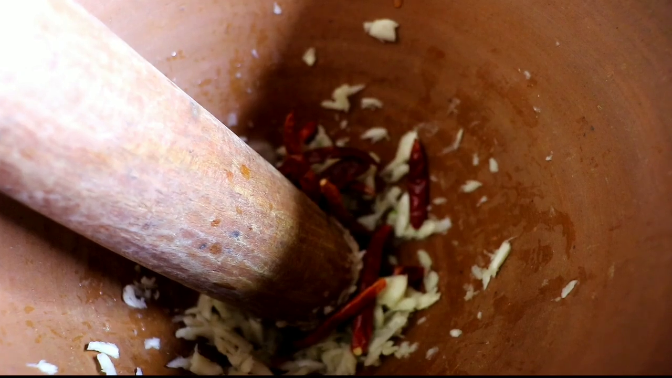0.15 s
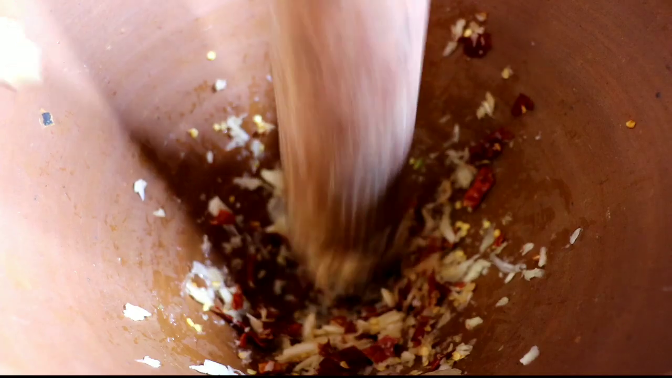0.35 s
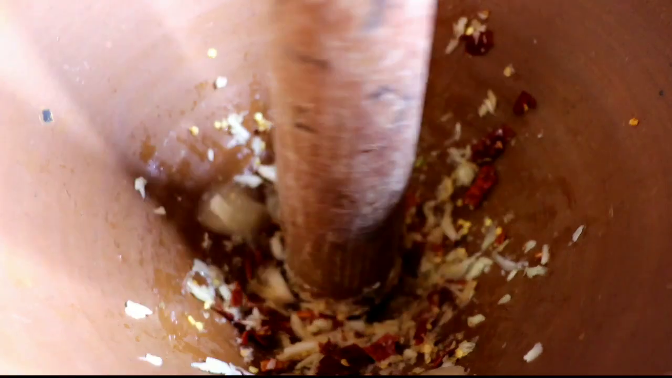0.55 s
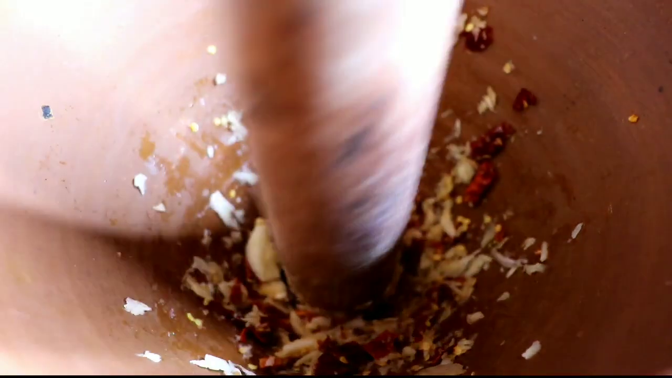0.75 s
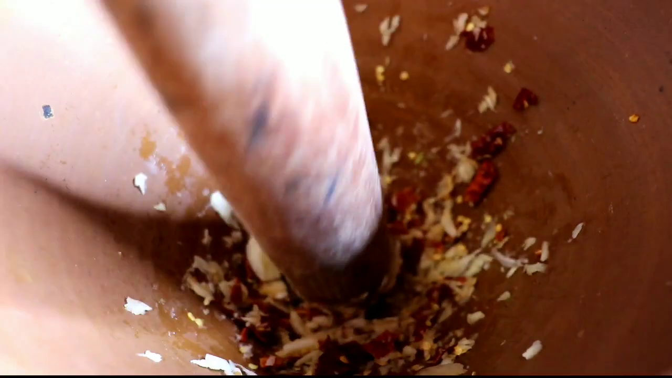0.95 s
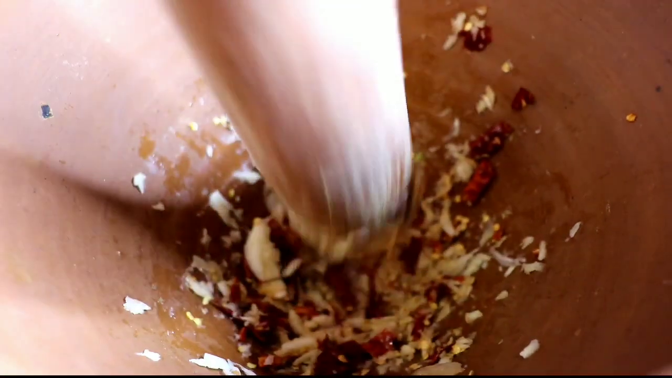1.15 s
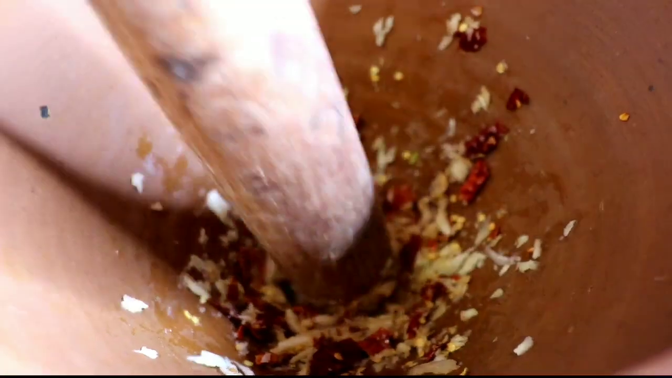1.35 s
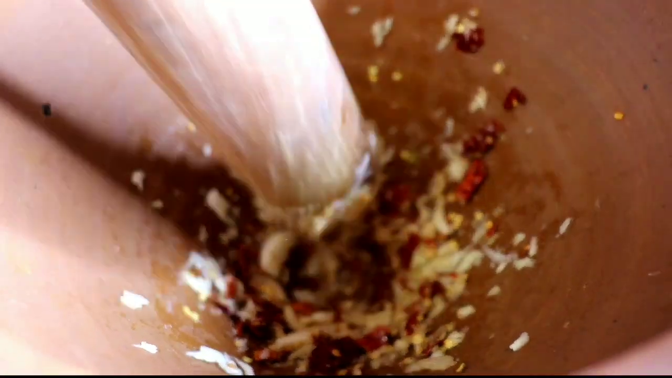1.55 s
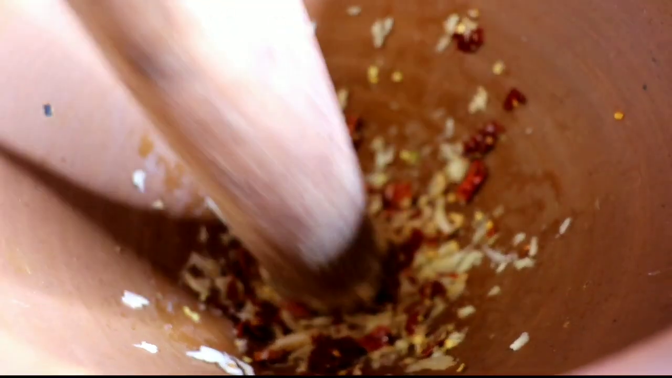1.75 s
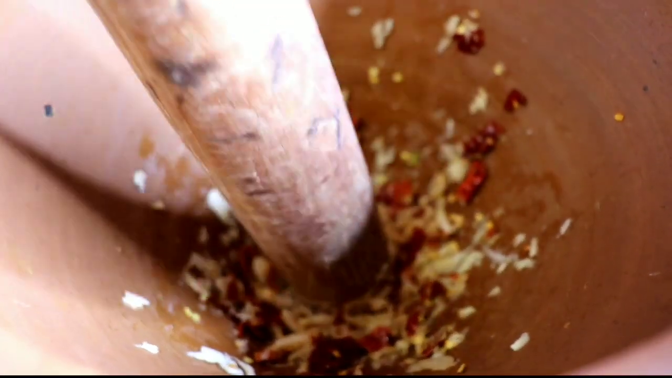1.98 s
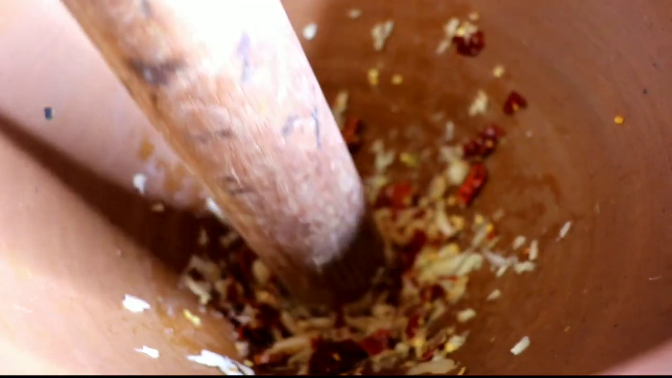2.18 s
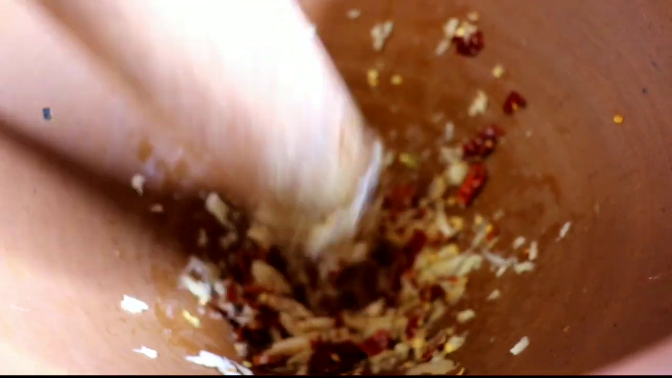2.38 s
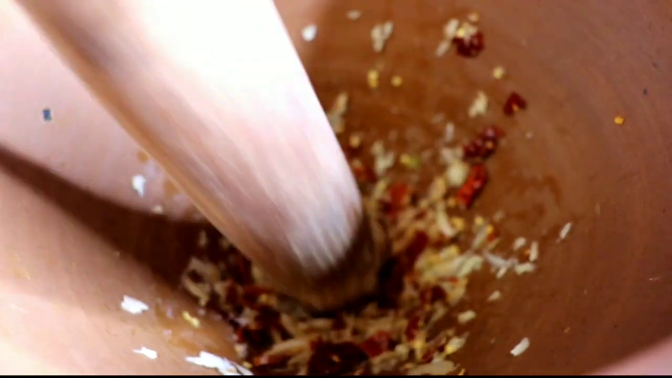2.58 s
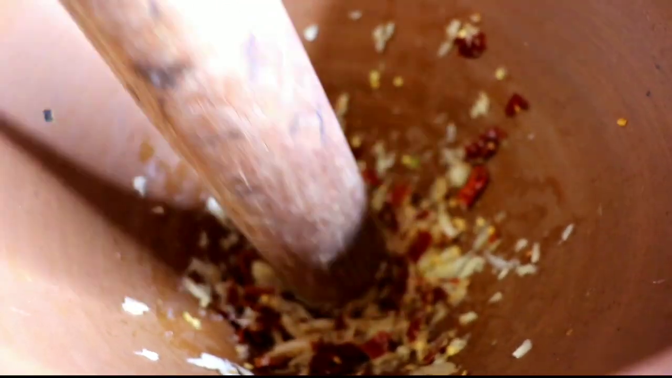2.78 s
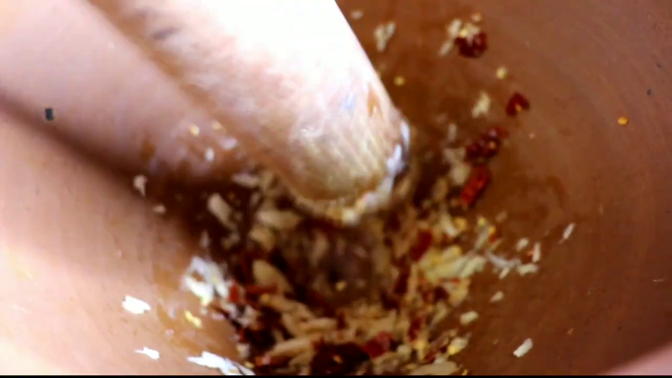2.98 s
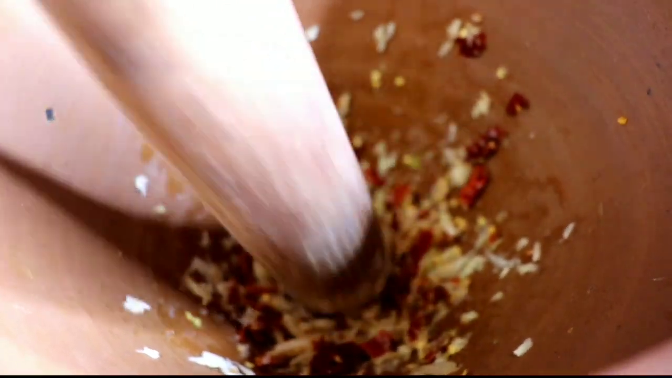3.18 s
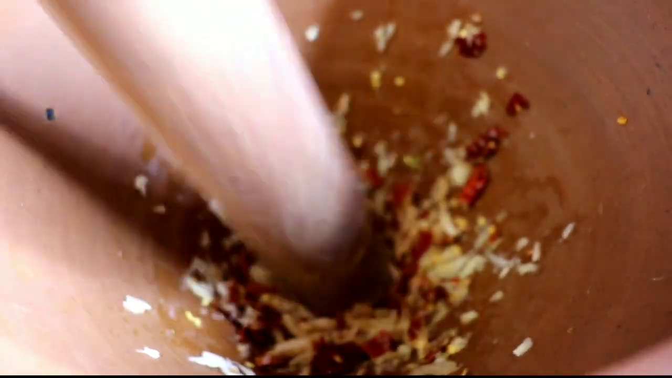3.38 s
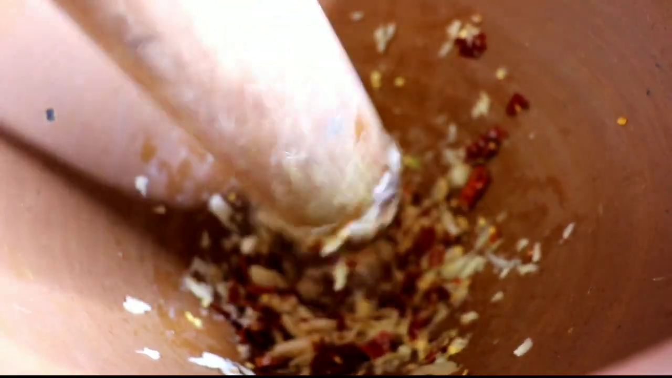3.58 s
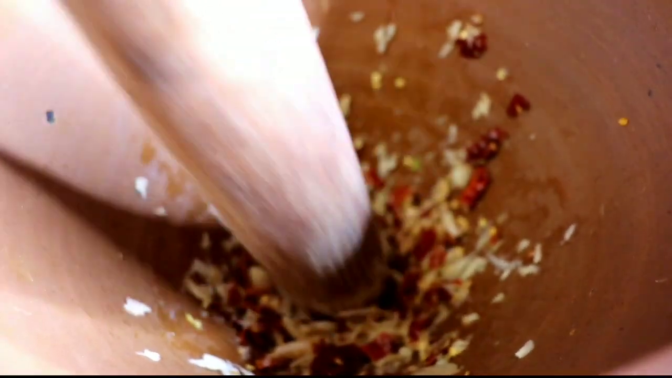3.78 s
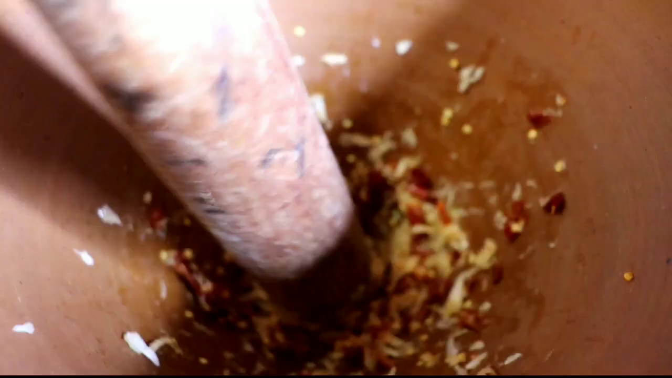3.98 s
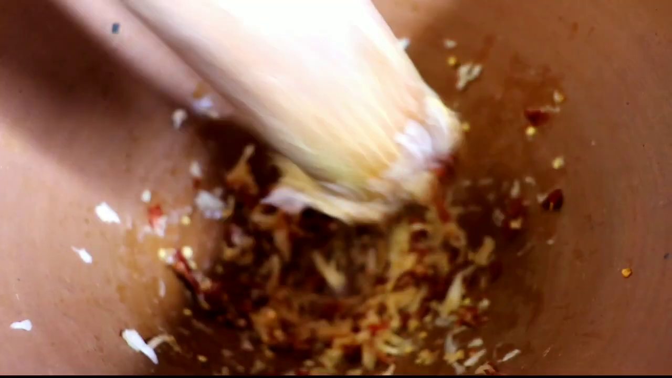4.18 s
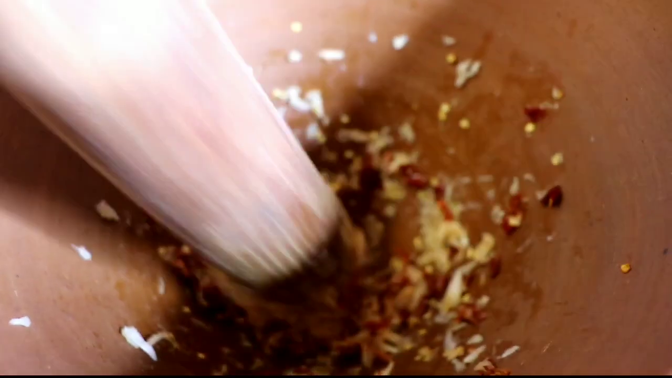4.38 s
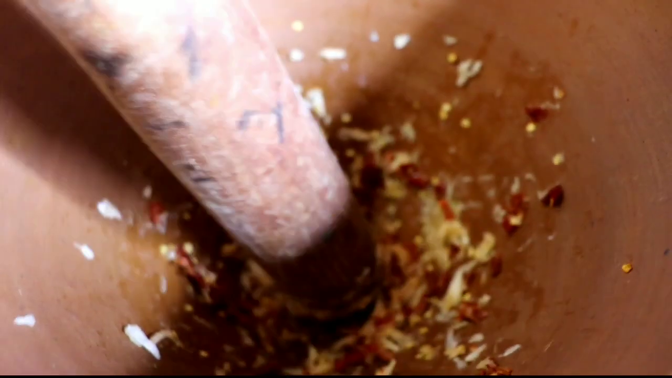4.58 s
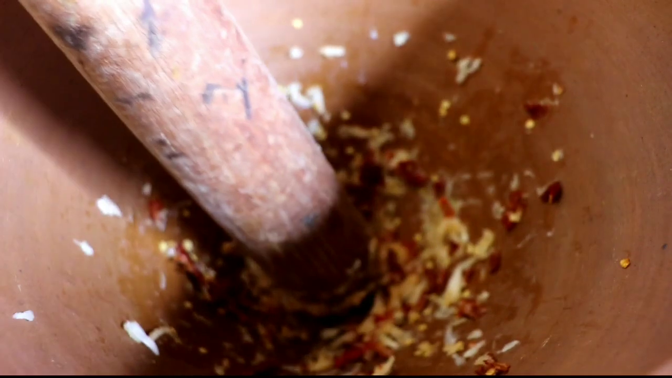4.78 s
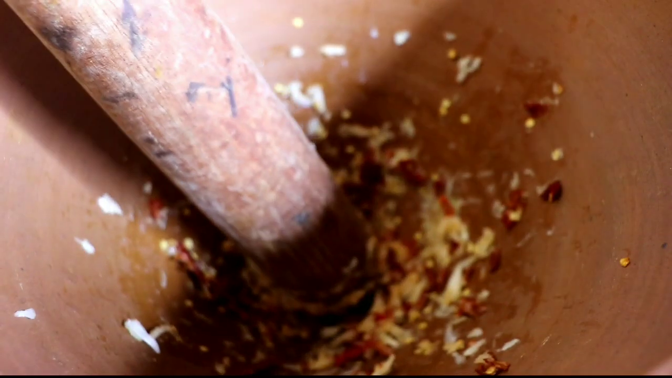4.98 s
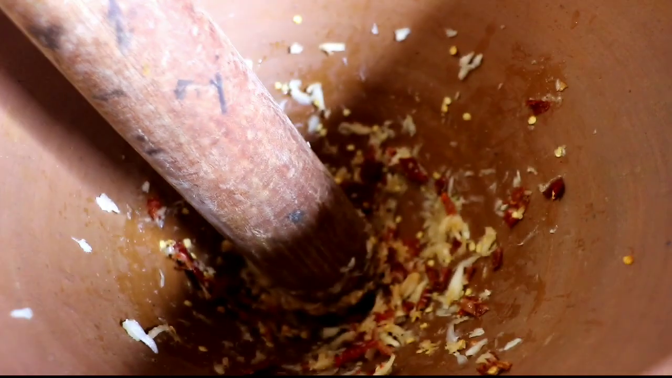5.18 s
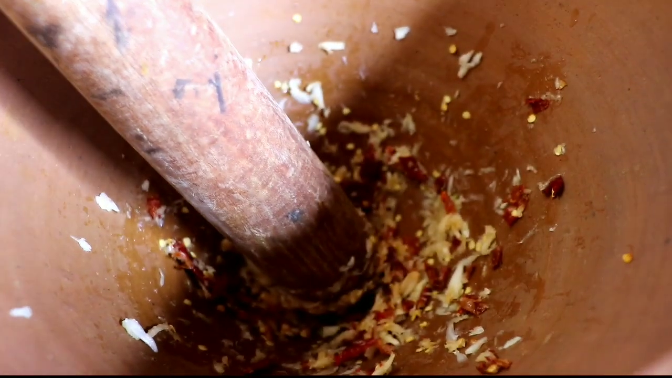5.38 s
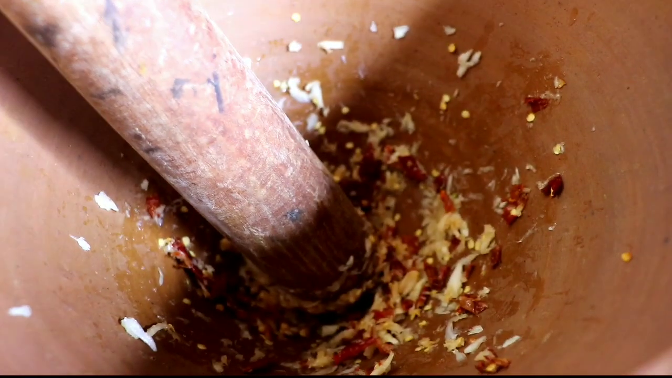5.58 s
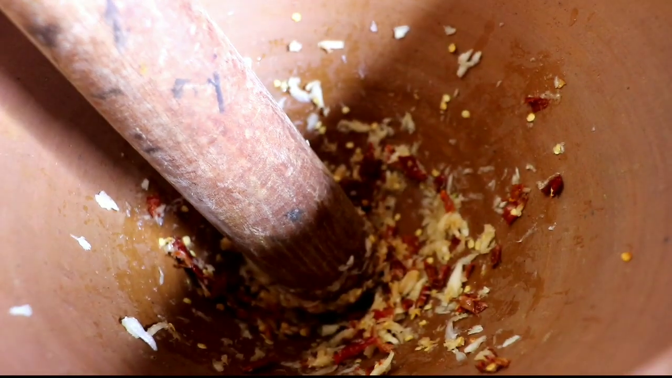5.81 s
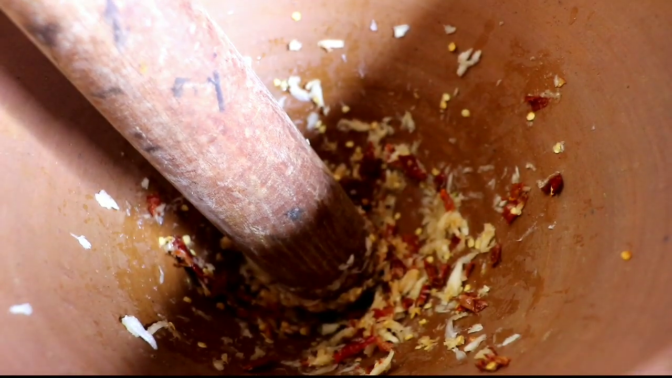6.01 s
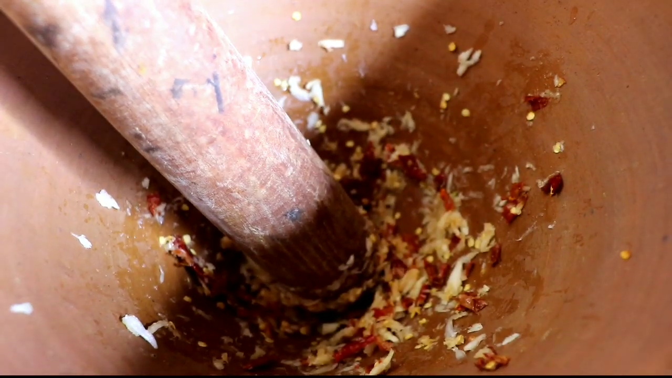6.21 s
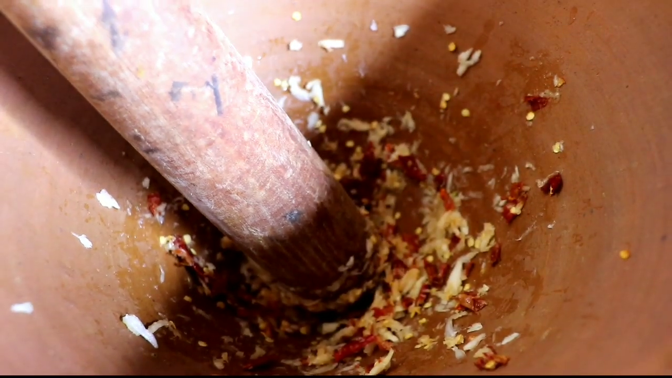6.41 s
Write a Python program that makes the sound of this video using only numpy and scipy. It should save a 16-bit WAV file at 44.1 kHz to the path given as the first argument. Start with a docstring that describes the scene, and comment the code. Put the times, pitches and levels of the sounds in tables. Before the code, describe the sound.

Close up in a kitchen, a wooden pestle knocks into a clay mortar about three times a second, crushing garlic and chilli with gritty crunches and a brief hollow ring. The blows start lighter, then land harder and overload a little as the level gradually falls. After a split-second dropout come three last blows, followed by faint scraping through the paste, small squeaks and soft brushing over quiet room tone.

```python
"""A wooden pestle pounds garlic and chilli in a clay mortar, close under a small stereo microphone.
Lighter blows open: each crushes spice, booms in the bowl, rings the clay and often rebounds.
From 2 s they land harder and overload; the gain ducks and lets the kitchen's echo swell back.
A fader sinks, mutes for an instant at 4 s and comes up again over three more blows.
Then the tip drags, taps and squeaks faintly in the bowl, and soft low brushings close the scene."""
import sys
import numpy as np
from scipy import signal
from scipy.fft import rfft, irfft, next_fast_len
from scipy.io import wavfile
from scipy.ndimage import uniform_filter1d

SR = 44100
rng = np.random.default_rng(int(sys.argv[2]) if len(sys.argv) > 2 else 0)


def int16_out(signal):
    """Quantize to a 16-bit WAV file."""
    q = np.round(np.clip(np.atleast_2d(signal).T, -1, 1) * 32767)
    wavfile.write(sys.argv[1], SR, q.astype(np.int16))


N = 284445

# Pestle hits: (time [s], boom [dB], clay ring [dB], wood clack [dB], table thud [dB], contact [ms],
# room send [dB], crush [dB], crush left over right [dB])
BLOWS = [(0.2919, -6, 0, -4, -37.5, 0.51, 20, -26, -4.5),
         (.594, -18.5, -29, -21.5, -22, 1.05, 12.5, -3, -8),
         (.918, -48.5, -58, -48, -34, 0.9, 7.5, -30.5, 2),
         (1.399, -1, -32, -24.5, -11.5, 1.13, 14, -6.5, 0),
         (1.687, -4, -36, -29, -11.5, 1.1, 16.5, -10, -7),
         (1.9784, 10.5, 4.5, 7, -7.5, 0.47, 8.5, -0.5, -2.5),
         (2.274, 12.5, 3.5, 11, -2.5, 0.12, 6, -4.5, 22.5), (2.5568, 7, -10, -1.5, -5, .6, 13.5, -4, -3.5),
         (2.852, 9, -2.5, 1, -6, 0.46, 7.5, -10, -1), (3.1689, 14, -1, 16, -1.5, 0.4, 3.5, 0, 7),
         (3.4884, 9.5, -11, -0.5, -10, 0.51, 10.5, -3, -2), (3.803, 19, -10, 1, -6, 0.23, 13, 8.5, 9.5),
         (4.074, -15.5, -26.5, -29, -16, .85, 25.5, -19.5, 6),
         (4.387, 9.5, -3.5, -3, -8.5, 0.95, 10.5, -4, -3), (4.6889, 12.5, -0.2, 8.5, -14, 0.32, 6.5, -5, 2),
         (5.265, -45, -47.5, -55.5, -49, .74, 6, -61, -3)]
# The pestle lands again: (time [s], boom [dB], clay ring [dB], crush [dB], crush left over right [dB])
REBOUNDS = [(0.329, -43, -27, -10, -2.5), (1.416, -4, -34, -1, -1.5), (1.705, -3, -27.5, -2.5, 7.5),
            (2.015, 3, -5, 2.5, -1.5), (2.295, 10.5, -8, 3.5, -0.5), (2.587, 0, -5.5, -1, -4),
            (2.881, 5, -17, 1, 0.5), (3.191, 15.5, 3.5, 6, -4.5), (3.503, -10.5, -35, 2.5, -4),
            (4.410, -12, 0.5, -1, 6.5), (4.721, 8.5, -4, 4.5, -2.5)]
# Modes of the air in the bowl, the clay wall and the pestle: (pitch [Hz], level [dB], t60 [s])
HOLLOW_MODES = [(406.6, 3, 0.047), (390.9, -14.5, 0.23), (401, -20.5, 0.27), (520, -16.5, 0.048),
                (680, -35.5, .025)]
CLAY_MODES = [(782, -10.5, 0.27), (716, -24.5, 0.17), (2200, -17, 0.22), (2660, -18, .15), (4900, -27, .06)]
WOOD_MODES = [(923.5, -14.5, 0.15), (988, 4, 0.027), (1095, -6, 0.036), (1225, -3, 0.019),
              (1387, -5, 0.033), (1585, 5, 0.017), (1823, -1.5, 0.015), (2026, -9.5, 0.048),
              (2254, -11, 0.078), (3535, -19.5, 0.01), (4200, -18, 0.01)]
# Loose spice crushed or flicked: (peak time [s], level [dB], attack [ms], decay [ms], centre [Hz])
CRUNCHES = [(.3, -22.5, 2.7, 70, 2500), (.593, -11, 17, 8.4, 3030), (.669, -25.5, 2.8, 3.5, 4000),
            (.743, -31.5, .64, 7.7, 2520), (.867, -55, 2.5, 3.8, 7450), (1.001, -44.5, 5.6, 11, 3540),
            (1.071, -41, 1.16, 5.6, 6900), (1.117, -33, 1.67, 3.6, 2600), (1.135, -42, 1.4, 7.4, 3100),
            (1.193, -43.5, 2.5, 3.3, 6500), (1.27, -48.5, 1.1, 4.7, 3500), (1.775, -20.5, 0.7, 4, 3270),
            (2.035, -8, .6, 1.4, 4140), (2.363, -21, 0.84, 2.2, 2940), (2.963, -25, 2.1, 7.3, 3500),
            (3.006, -34, 1.6, 2.9, 3520), (3.452, -43, 1, 9.6, 3000), (3.567, -20, 1, 5.3, 3520),
            (4.078, -20.5, 6.7, 45, 2780), (4.129, -21.5, 2.1, 4.7, 3930), (4.442, -15, 2.6, 5.8, 4000),
            (4.93, -38.5, 1.04, 1.5, 5760), (4.969, -43, 1.2, 8.1, 4290), (5.201, -40, .32, 2, 2310),
            (5.376, -42, 0.81, 15, 5000), (5.523, -42, .9, 26, 3580), (5.568, -28.5, 1.84, 4.6, 1355),
            (5.578, -41, 9.8, 41, 6250), (5.724, -44.5, 3.1, 3.1, 3650), (5.771, -48, 1.35, 2.5, 2090),
            (5.818, -43.5, 2.14, 2.6, 3470), (5.913, -52, 1.8, 1.8, 4000), (6.177, -55, 2.1, 13, 2500)]
# The tip on bare clay: (time [s], level [dB], decay [ms], pitch [Hz])
SQUEAKS = [(.748, -36, 16.2, 2240), (1.003, -34, 14, 2285), (1.12, -41, 22, 2300), (1.286, -50, 52, 2180),
           (5.267, -43, 7.5, 2140), (5.568, -39, 70, 1390), (5.575, -46.5, 79, 4660), (5.663, -54, 19, 393)]
# The tip in the paste, one envelope a stroke: (time [s], level [dB])
DRAGS = [
    [(0.62, -27), (0.74, -47), (0.968, -43.5), (1.26, -49), (1.39, -51.5)],
    [(4.92, -49), (5.042, -60.5), (5.32, -58), (5.596, -50), (5.678, -50.5), (5.856, -58), (6.112, -90),
     (6.27, -52.5), (6.45, -73)],
]
# Brushings nearby: (peak time [s], level [dB], swell [dB/s], fade [dB/s])
BRUSHINGS = [(5.672, -46, 300.5, 133), (5.96, -63, 45, 302), (6.214, -35, 131, 100)]
# EQ curves of table top, spice, paste, brushing and kitchen air: (frequency [Hz], level [dB])
THUD_EQ = [(25, -23.5), (55, -3), (110, -2.5), (143, 1), (185, -5), (260, -10.5), (400, -34),
           (16000, -81.5)]
CRUNCH_EQ = [(100, -27), (500, -17.5), (1200, -3.5), (3200, -10.5), (6000, -11), (9000, -12),
             (12000, -21.5), (16000, -29)]
DRAG_EQ = [(60, 6.5), (250, 0.5), (600, -29), (985, 3), (1400, -11.5), (2280, 3.5), (3600, -4.5),
           (8500, -10), (12500, -16.5), (16000, -45.5)]
BRUSH_EQ = [(35, -69), (60, -31.5), (354, 1), (427, -11), (579, -4), (991, -9), (1660, -13), (3850, -22),
            (16000, -45)]
AIR_EQ = [(15, -30), (25, -12), (153, -3.5), (236, -5.5), (384, -1), (476, -5), (1440, -7), (8360, -18.5),
          (14400, -32.5), (16000, -49)]
# Reverb time of the kitchen: (frequency [Hz], t60 [s])
ROOM_T60 = [(60, 0.76), (400, 0.24), (1000, 0.47), (2500, 0.32), (6000, 0.38), (14000, 0.3)]
# How alike the two microphone ports hear: (frequency [Hz], likeness [0-1])
STEREO_LIKENESS = [(60, 0.97), (170, 0.85), (400, 0.9), (1200, 0.12), (2500, 0.3), (5000, 0.0088),
                   (14000, 0.046)]

TIME = np.arange(N) / SR


def pestle():
    """A short smooth push excites bowl, wall and pestle: the shorter the contact, the brighter the hit."""
    knock, sends, thuds = np.zeros(N), np.zeros((3, N)), np.zeros((2, N))
    t = np.arange(SR // 3) / SR
    for k, (s, boom_db, clay_db, wood_db, thud_db, contact_ms, send_db) in enumerate(landings()):
        push = t[:200] * np.exp(-t[:200] * 5000 / contact_ms)  # peaks at a fifth of the contact
        bowl = amp(boom_db) * ring(HOLLOW_MODES, t) + amp(clay_db) * ring(CLAY_MODES, t)
        wood = amp(wood_db) * ring(WOOD_MODES, t)
        boom, clack = signal.oaconvolve([bowl, wood], [push / push.sum()], axes=1)
        add(knock, s, boom + amp(0.5) * clack)  # the bowl throws the clack up at the microphone
        add(sends[k % 3], s, amp(send_db) * (boom + clack))
        thud, lead_s = table_thud(thud_db)
        add(thuds, s + .004 - lead_s, thud)
    thuds[0] = np.roll(thuds[0], round(.00038 * SR))  # the shake reaches the left port late
    return knock, sends, thuds


def landings(contact_ms=.45, send_db=9.5):
    """Blows and rebounds in time order; a rebound's clack follows its clay ring, its thud its boom."""
    rebounds = [(s, boom, clay, clay - 12.5, .23 * boom - 12.5, contact_ms, send_db)
                for s, boom, clay, _, _ in REBOUNDS]
    return sorted([row[:7] for row in BLOWS] + rebounds)


def ring(modes, t):
    """Dying sines; where the pestle lands changes the share of each mode a little."""
    hz, db, t60 = np.transpose(modes)[:, :, None]
    shift_db = rng.normal(0, 1.5, db.shape)
    detune = rng.normal(1, .004, hz.shape)
    return (amp(db + shift_db - 60 * t / t60) * np.sin(2 * np.pi * hz * detune * t)).sum(0)


def table_thud(db):
    """The table shakes the microphone, each port a little differently; also gives the lead-in [s]."""
    envelope, lead_s = burst(1.8, 23, tail_db=-17.5, tail_ms=70)
    shake = stereo(rng.standard_normal((2, len(envelope))), lambda hz: curve(THUD_EQ, hz))
    return amp(db) * pan(-1.5) * envelope * shake, lead_s


def spice():
    """Gritty bursts that build as the spice gives way, each with a broad peak in the treble."""
    out = np.zeros((2, N))
    for s, db, attack_ms, decay_ms, centre_hz, pan_db in crushes():
        envelope, lead_s = burst(attack_ms, decay_ms, tail_db=-16.5)
        crunch = stereo(grit(len(envelope), depth_db=2.5, grain_samples=25),
                        lambda hz: curve(CRUNCH_EQ, hz) + bell_db(hz, centre_hz))
        add(out, s - lead_s, amp(db) * pan(pan_db) * envelope * crunch)
    return out


def crushes(clack_db_per_octave=53):
    """Cues for crushed spice: a harder clack lifts the centre; rebounds crush slower and darker."""
    blows = [(s + .0012, db, 3.6 * contact_ms, 4.2, 4850 * 2 ** (wood_db / clack_db_per_octave), pan_db)
             for s, _, _, wood_db, _, contact_ms, _, db, pan_db in BLOWS]
    rebounds = [(s - .0012, db, 6.5, 5.2, 3330, pan_db) for s, _, _, db, pan_db in REBOUNDS]
    loose = [(*row, rng.normal(-.1, 1.5)) for row in CRUNCHES]  # scattered near the middle
    return blows + rebounds + loose


def squeaks():
    """The tip rubs bare clay: short, narrow bands of gritty noise."""
    out = np.zeros((2, N))
    for s, db, decay_ms, pitch_hz in SQUEAKS:
        envelope, lead_s = burst(.17 * decay_ms, decay_ms)
        half_width_hz = .06 * pitch_hz
        squeak = stereo(grit(len(envelope), depth_db=2.5, grain_samples=84),
                        lambda hz: -20 * np.log10(1 + ((hz - pitch_hz) / half_width_hz) ** 2))
        add(out, s - lead_s, amp(db) * envelope * squeak)
    return out


def drag():
    """The tip drags through the paste, its grit coming in clumps."""
    clumps = flicker(N, depth_db=2.5, grain_samples=900)
    paste = stereo(clumps * grit(N, depth_db=3.5, grain_samples=40), lambda hz: curve(DRAG_EQ, hz))
    strokes = sum(amp(np.interp(TIME, *np.transpose(stroke), left=-200, right=-200)) for stroke in DRAGS)
    return paste * strokes


def brushing():
    """Soft low brushings swell to a peak and fade at steady dB rates."""
    swells = sum(amp(db + np.minimum(swell * (TIME - s), fade * (s - TIME)))
                 for s, db, swell, fade in BRUSHINGS)
    return swells * stereo(grit(N, depth_db=1.86, grain_samples=330), lambda hz: curve(BRUSH_EQ, hz))


def room_tail():
    """The kitchen's reflections: sparse taps of random sign, each band dying at its own speed."""
    slots = np.arange(200, SR - 20, 20)
    arrivals = slots + rng.integers(0, 20, (2, len(slots)))
    taps = np.zeros((2, SR))
    np.put_along_axis(taps, arrivals, rng.choice([-1., 1.], arrivals.shape), 1)
    hz, t, bands = signal.stft(stereo(taps, np.zeros_like), SR, nperseg=512)
    decay = amp(-60 * t / curve(ROOM_T60, hz)[:, None])
    tail = signal.istft(bands * decay, SR, nperseg=512)[1]
    return tail / np.linalg.norm(tail[0])


def kitchen_air():
    """Room tone: a quiet, nearly smooth bed of noise."""
    return amp(-53.5) * stereo(grit(N, depth_db=.8, grain_samples=2000), lambda hz: curve(AIR_EQ, hz))


def burst(attack_ms, decay_ms, tail_db=-90, tail_ms=18):
    """Envelope that builds, dies and leaves a faint tail; also gives the lead-in to its peak [s]."""
    ms = np.arange(-3 * attack_ms, 6 * decay_ms + 4 * tail_ms, 1000 / SR)
    dying = np.exp(-ms / decay_ms) + amp(tail_db) * np.exp(-ms / tail_ms)
    return np.where(ms < 0, np.exp(1.22 * ms / attack_ms), dying), -ms[0] / 1000


def grit(size, depth_db, grain_samples):
    """Two noises that share random bursts; short grains sound like small fibres snapping."""
    return flicker(size, depth_db, grain_samples) * rng.standard_normal((2, size))


def flicker(size, depth_db, grain_samples):
    """A gain that wanders at random."""
    return amp(depth_db * unit_rms(uniform_filter1d(rng.standard_normal(size), grain_samples)))


def stereo(noises, eq_db):
    """Shapes two noises into an equalised pair, narrow in the bass and wide in the treble."""
    length = noises.shape[1]
    size = next_fast_len(length + 256)
    hz = np.fft.rfftfreq(size, 1 / SR)
    left, other = rfft(noises, size)
    likeness = curve(STEREO_LIKENESS, hz)
    right = likeness * left + np.sqrt(1 - likeness ** 2) * other
    return unit_rms(irfft(np.array([left, right]) * amp(eq_db(hz)), size)[:, :length])


def bell_db(hz, centre_hz, boost_db=9, octaves=.5):
    """A bell-shaped EQ boost."""
    return boost_db * np.exp(-(np.log2(hz / centre_hz + 1e-9) / octaves) ** 2)


def curve(points, hz):
    """Reads a table along log frequency."""
    point_hz, values = np.transpose(points)
    return np.interp(np.log(hz + 1), np.log(point_hz + 1), values)


def amp(db):
    """Decibels to gain."""
    return 10 ** (np.asarray(db) / 20)


def pan(db):
    """Channel gains that put left this far above right."""
    return amp([[db / 2], [-db / 2]])


def unit_rms(x):
    """Scales to rms 1."""
    return x / np.sqrt(np.mean(x ** 2) + 1e-20)


def add(mix, s, sound):
    """Mixes a sound in at s seconds."""
    part = mix[..., max(round(s * SR), 0):][..., :sound.shape[-1]]
    part += sound[..., :part.shape[-1]]


def lag(x, seconds):
    """One-pole smoothing with this time constant."""
    pole = np.exp(-1 / (seconds * SR))
    return signal.lfilter([1 - pole], [1, -pole], x)


def duck(dry, threshold_db=-24.5, slope=.62, hold_s=.022):
    """Automatic gain that dives within milliseconds of a loud hit, holds and recovers."""
    power_db = 10 * np.log10(lag((dry ** 2).mean(0), .0016) + 1e-12)
    release_db = 277 * TIME
    peak_db = np.maximum.accumulate(power_db + release_db) - release_db
    over_db = np.maximum(peak_db - threshold_db, 0)
    held_db = np.maximum(over_db, np.roll(over_db, round(hold_s * SR)))
    return dry / amp(slope * lag(held_db, .0054))  # the gain follows late, so the first cycles overload


def fader(open_s=.29, sink_s=2.17, mute_s=4.016, reopen_s=4.066, full_s=4.36, end_s=6.5):
    """A fader ride: opens, sinks ever faster, mutes for an instant and is brought back up."""
    down_db = -21.5 * np.clip((TIME - sink_s) / (mute_s - sink_s), 0, 1) ** 2.29
    up_db = -7.5 * np.clip((full_s - TIME) / (full_s - reopen_s), 0, 1)
    sinking = amp(down_db) * (TIME > open_s) * (TIME < mute_s)
    rising = amp(up_db) * (TIME > reopen_s) * (TIME < end_s)
    return uniform_filter1d(sinking + rising, size=45)


def scene(dip_hz=622, dip_width_hz=101):
    """The mortar up close; knocks, crunches and squeaks also feed three paths through the room."""
    knock, sends, thuds = pestle()
    crackle = spice() + squeaks()
    turns = TIME / .012 + np.arange(3)[:, None] / 3  # each moment of a crunch takes another path
    sends = sends + amp(-2) * crackle.mean(0) * np.cos(np.pi * turns)
    room = sum(signal.oaconvolve(send[None], room_tail(), axes=1)[:, :N] for send in sends)
    direct = np.array([amp(2.5) * np.roll(knock, 2), amp(5.5) * knock])  # reaches the right port first
    low_cut = signal.butter(4, 300, "high", fs=SR, output="sos")  # a small bowl radiates little bass
    dip = signal.iirnotch(dip_hz, dip_hz / dip_width_hz, SR)  # hollow and wall cancel between their tones
    mortar = signal.lfilter(*dip, signal.sosfilt(low_cut, direct + amp(-14) * room))
    return mortar + thuds + crackle + drag() + brushing() + kitchen_air()


def record(dry, high_cut_hz=16300):
    """The output chain: ducking, DC blocker, hard overload, fader, high cut."""
    centred = signal.lfilter([1, -1], [1, -.999], duck(dry))
    faded = np.clip(centred, -.96, .96) * fader()
    high_cut = signal.firwin(255, high_cut_hz, window=("kaiser", 8), fs=SR)
    return signal.oaconvolve(faded, high_cut[None], "same")


dry = scene()
out = record(dry)
int16_out(out)
```